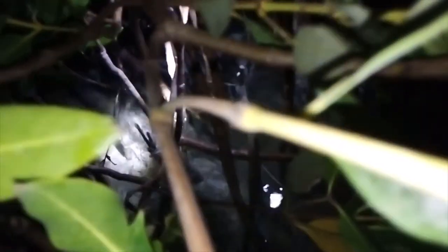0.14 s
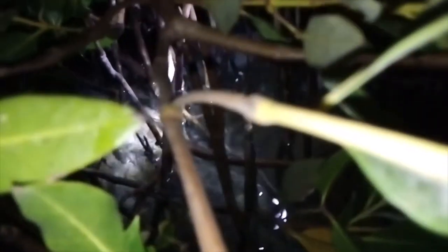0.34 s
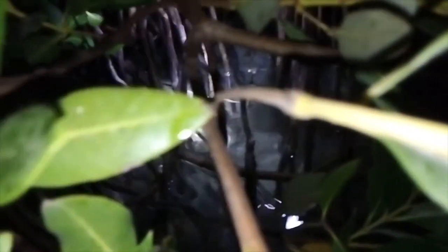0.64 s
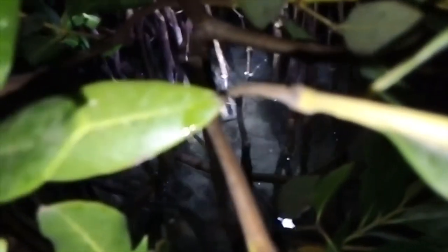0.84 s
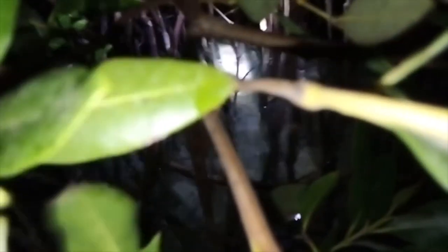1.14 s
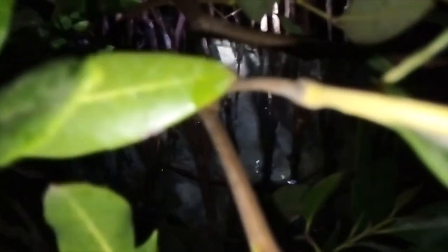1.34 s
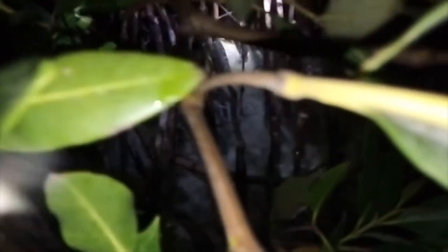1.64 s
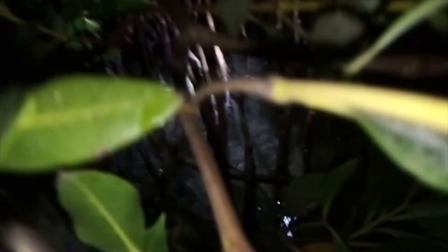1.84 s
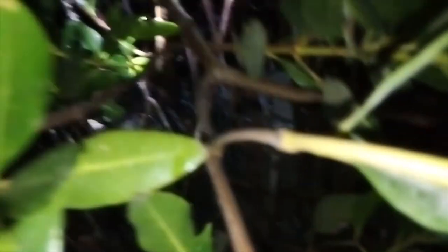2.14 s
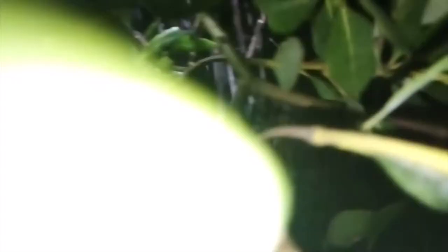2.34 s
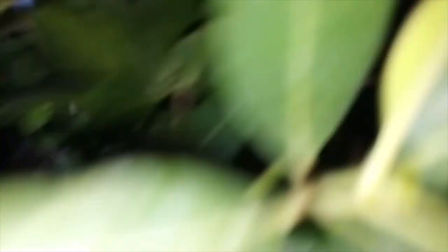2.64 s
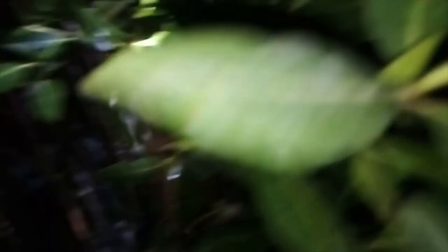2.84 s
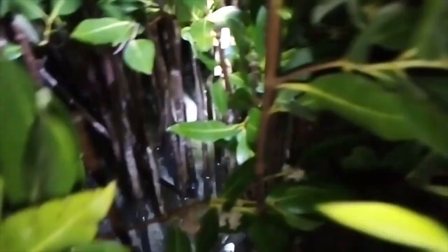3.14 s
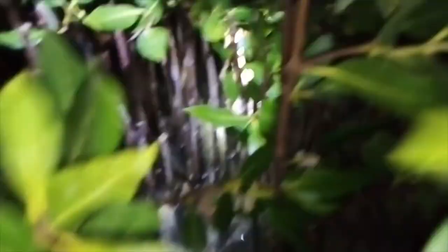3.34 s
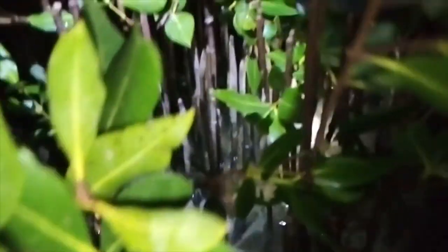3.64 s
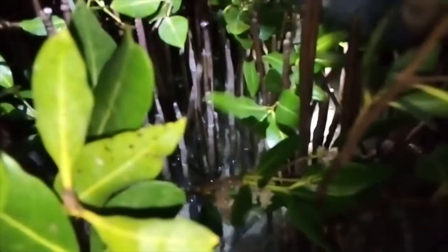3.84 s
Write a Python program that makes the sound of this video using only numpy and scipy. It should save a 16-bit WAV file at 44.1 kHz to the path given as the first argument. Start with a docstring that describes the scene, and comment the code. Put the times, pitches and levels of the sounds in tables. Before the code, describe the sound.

Shallow water sloshes and gurgles softly around wading legs, with leaves brushing the microphone and faint handling rumble. Small splashes, plops and twig ticks follow from 0.5 seconds, easing around 1.3. From 2.2 seconds the sloshing and twig cracks grow, and leaves swish loudly at 3.3. At about 3.7 a branch knocks the microphone in the loudest rush of water and leaves, which quickly fades.

```python
"""Legs wade slowly through shallow water in a thicket, heard by a small hand-held camera.
From the start water sloshes, gurgles and plops with ringing bubbles, leaves scrape past the
microphone and the hand's grip rumbles faintly below. Splashes follow from half a second on, then
twigs tap and tick. After a lull everything swells, and near the end, in a rush of leaves and
water, a branch knocks the camera body."""
import sys
import numpy as np
from scipy import signal
from scipy.fft import rfft, irfft
from scipy.io import wavfile
from scipy.ndimage import uniform_filter1d, map_coordinates

SR = 44100
rng = np.random.default_rng(int(sys.argv[2]) if len(sys.argv) > 2 else 0)


def to_wav(sig):
    """Store sig (one row per channel, or 1-D mono) as 16-bit WAV at the path in sys.argv[1].

    Samples outside -1..1 are clipped; the rate is SR.
    """
    pcm = np.clip(np.atleast_2d(sig), -1, 1) * 32767
    pcm = np.round(pcm).astype(np.int16)
    wavfile.write(sys.argv[1], SR, pcm.T)  # frames by channels


N = 176400

# Tone colour of stirred water, also lent to the twig cracks: f/Hz, level/dB
WATER_SPECTRUM = [(150, -46), (300, 4), (500, -17), (1000, 5.5), (1800, 3), (3200, 4.5), (4500, -6.5),
                  (7000, -9), (9000, -79)]
BUBBLE_HZ, BUBBLE_SPREAD, BUBBLE_CYCLES = 1438, 0.5514, 13.8
BUBBLE_GLIDE = .25  # a bubble's pitch climbs by this fraction over its life


def amp(db):
    return 10 ** (np.asarray(db) / 20)


def unit(x):
    return x / np.sqrt(np.mean(x ** 2) + 1e-20)


def fader(points):
    """A level for every sample, in straight lines between (time, level) points."""
    return np.interp(np.arange(N) / SR, *np.transpose(points))


def wobble(rate):
    """A smooth random curve, rate knots a second."""
    return map_coordinates(rng.standard_normal(int(N * rate / SR) + 4), [np.arange(N) * rate / SR])


def coloured(x, spectrum):
    """x through a minimum-phase filter with the given (Hz, dB) shape."""
    size = 2 ** 18
    hz, db = np.transpose(spectrum)
    gain_db = np.interp(np.log(np.fft.rfftfreq(size, 1 / SR) + 1), np.log(hz), db)
    cepstrum = irfft(gain_db * np.log(10) / 20)
    cepstrum[1:size // 2] *= 2
    cepstrum[size // 2 + 1:] = 0
    return irfft(rfft(x, size) * np.exp(rfft(cepstrum)))[:N]


def patchy_noise(depth_db):
    """White noise with patches of random gain in time and frequency."""
    spectra = signal.stft(rng.standard_normal(N), nperseg=256)[2]
    patches = uniform_filter1d(uniform_filter1d(rng.standard_normal(spectra.shape), 4, 0), 6, 1)
    return unit(signal.istft(spectra * amp(depth_db * unit(patches)), nperseg=256)[1][:N])


def rings(onsets, gain, hz, cycles, glide, attack_cycles):
    """Damped sines; over a life of `cycles` each falls 20 dB and bends by the fraction `glide`."""
    t = np.arange(1400) / SR
    turns = hz[:, None] * t
    lives = turns / np.reshape(cycles, (-1, 1))
    tone = np.sin(2 * np.pi * turns * (1 + glide * lives / 2))
    envelope = amp(-20 * lives) * (1 - np.exp(-turns / attack_cycles)) * np.cos(np.pi * t / t[-1] / 2)
    at = np.round(onsets * SR).astype(int)[:, None] + np.arange(len(t))
    return np.bincount(at.ravel(), (gain[:, None] * tone * envelope).ravel(), N + SR)[:N]


def bubbles(centre_hz, spread, cycles, count):
    """A stream of bubbles at rms 1, log-normal in pitch; the big, low ones tend to ring louder."""
    when, weakness, life = rng.random((count, 3)).T
    hz = np.clip(centre_hz * np.exp(spread * rng.standard_normal(count)), 280, 7000)
    gain = amp(-4 * np.log(weakness + .06) - 2 * np.log2(hz / centre_hz))
    return unit(rings(when * N / SR, gain, hz, cycles * (.5 + life), BUBBLE_GLIDE, attack_cycles=0.78))


def slosh():
    """Legs stir the water: equal parts bubbles and rush, with a crackle of droplets and twigs."""
    # Swell of the sloshing: t/s, level/dB
    swell = [(0, -51), (.2, -49.5), (.48, -44.5), (.6, -49), (.65, -68.5), (.88, -63), (1.0, -51.5),
             (1.15, -58), (1.3, -62.5), (1.38, -73), (1.47, -59.5), (1.7, -54), (1.83, -60.5),
             (2.17, -57.5), (2.32, -44.5), (2.45, -48.5), (2.52, -67), (2.64, -47), (2.9, -46),
             (3.03, -49.5), (3.25, -40.5), (3.42, -45), (3.46, -55.5), (3.58, -49.5), (3.75, -34.5),
             (3.9, -57), (4, -55)]
    rush = unit(coloured(patchy_noise(depth_db=3) * amp(2 * wobble(60)), WATER_SPECTRUM))
    froth = bubbles(BUBBLE_HZ, BUBBLE_SPREAD, BUBBLE_CYCLES, count=1500)
    crackle = amp(-4.5) * bubbles(centre_hz=2090, spread=0.51, cycles=1.43, count=320)
    return amp(fader(swell) + wobble(15)) * (np.sqrt(.5) * (froth + rush) + crackle)


def gurgle():
    """Larger bubbles ring low beneath the slosh."""
    # Swell of the gurgling: t/s, level/dB
    swell = [(0, -50.5), (.4, -48.5), (.56, -66), (.65, -72), (1.9, -93), (2.3, -61), (2.5, -64.5),
             (2.85, -49), (3.4, -55.5), (3.47, -58.5), (3.7, -29), (3.85, -51.5), (4, -65)]
    return amp(fader(swell)) * bubbles(centre_hz=564.5, spread=0.285, cycles=BUBBLE_CYCLES, count=1300)


def leaves():
    """Near leaves scrape, flick and drip past the microphone; far leaves hiss steadily."""
    # Swell of the scraping: t/s, level/dB
    swell = [(0, -59), (.3, -58), (.6, -66), (.68, -66.5), (.85, -63.5), (1.0, -68.5), (1.27, -66),
             (1.33, -87), (1.41, -61.5), (1.85, -65.5), (2.2, -53.5), (2.45, -55), (2.51, -53.5),
             (2.8, -51), (3.0, -51.5), (3.22, -52), (3.33, -47), (3.43, -43), (3.46, -53), (3.56, -42.5),
             (3.76, -31), (3.9, -45.5), (3.945, -56.5), (4, -75)]
    # Flicks and swishes, sudden bursts of the same scraping: t/s, level/dB, t60/s, rise/s
    flicks = [(0.588, -40.5, 0.047, 0.0017), (0.8032, -46.5, 0.033, .0004), (.865, -41.5, 0.07, 0.00055),
              (.891, -45.5, 0.099, 0.00029), (0.94, -45.5, 0.16, .0005), (1.162, -47, 0.059, 0.00093),
              (1.205, -51.5, 0.11, 0.00095), (2.008, -45.5, 0.13, 0.005), (2.247, -62, 0.016, 0.00055),
              (2.407, -40, 0.084, 0.0033), (2.62, -36, 0.026, 0.00044), (2.769, -34, 0.0085, 0.00039),
              (3.045, -56, 0.02, 0.0049), (3.261, -11, 0.15, 0.013), (3.377, -26.5, 0.042, 0.0038),
              (3.503, -27, 0.094, 0.0087), (3.579, -37.5, 0.07, .001), (3.605, -20, 0.023, 0.00095),
              (3.646, -18, 0.051, 0.0059), (3.672, -25.5, 0.028, 0.0013), (3.709, -22, 0.05, 0.0023),
              (3.957, -29, 0.032, 0.00049), (3.967, -40.5, 0.014, 0.00041)]
    # Leaf scrape as heard through the microphone's resonances and treble cut-off: f/Hz, level/dB
    scrape_at_mic = [(300, -19), (1200, -10.5), (2700, -1), (4340, -6), (6300, 0.5), (7200, -5.5),
                     (8300, -14), (13200, -25.5), (14900, -12.5), (15700, -11), (15950, -72)]
    scratches_per_s, scratch_share = 3600, 0.54
    scrape_db = fader(swell)
    sizes = amp(3 * np.minimum(rng.exponential(size=N), 2.5))
    scratches = unit((rng.random(N) < scratches_per_s / SR) * rng.standard_normal(N) * sizes)
    rub = np.sqrt(scratch_share) * scratches + np.sqrt(1 - scratch_share) * patchy_noise(depth_db=5.5)
    stroke = amp(scrape_db + 2.5 * wobble(30))
    for onset, db, t60, rise in flicks:
        age = np.clip(np.arange(N) / SR - onset, 0, 1)
        stroke += amp(db - 60 * age / t60) * (1 - np.exp(-age / rise)) ** 2 * (age < 1)
    drips = amp(scrape_db - 12) * bubbles(centre_hz=4800, spread=.25, cycles=14, count=240)
    near = coloured(rub * stroke, scrape_at_mic) / np.std(coloured(rub, scrape_at_mic)) + drips
    # Closer leaves are louder and brighter: the treble rides the level of the stroke.
    treble_hz, neutral_db, treble_db_per_db = 8700, -60.5, 0.16
    treble = signal.sosfiltfilt(signal.butter(4, treble_hz, "high", fs=SR, output="sos"), near)
    treble_gain = (stroke / amp(neutral_db)) ** treble_db_per_db
    far = amp(-77) * unit(coloured(rng.standard_normal(N), scrape_at_mic))
    return near + treble * (treble_gain - 1) + far


def grip_rumble():
    """The hand's grip sends a lumpy rumble through the camera body."""
    # Swell of the handling noise: t/s, level/dB
    swell = [(0, -62.5), (.4, -57), (.76, -64), (1.65, -62.5), (1.9, -64), (2.2, -55), (2.5, -60.5),
             (2.95, -45.5), (3.08, -52.5), (3.37, -38), (3.47, -62), (3.6, -36.5), (3.75, -31), (3.86, -61),
             (4, -52)]
    # Tone colour of the hand on the housing: f/Hz, level/dB
    hand_spectrum = [(25, -23), (50, -6), (110, -2), (170, -5.5), (300, -8.5), (450, -14), (900, -69)]
    lumpy_noise = rng.standard_normal(N) * amp(2.5 * wobble(21.93))
    return amp(fader(swell)) * unit(coloured(lumpy_noise, hand_spectrum))


def plops_and_pings():
    """Short ringing tones that chirp upward: single bubbles, and the bright ring of two leaf flicks."""
    # Bubbles, and leaf rings at 0.865 and 0.892 s: t/s, level/dB, starting f/Hz, life/cycles
    tones = [(.045, -37.5, 486, 20), (.078, -38, 533, 15), (.092, -33.5, 1460, 10.4),
             (.106, -36, 586, 13.4), (.247, -33, 1110, 8.6), (.324, -26.5, 3020, 12),
             (.457, -35.5, 3850, 15), (0.865, -37, 6350, 40), (.892, -32, 5870, 41),
             (1.157, -36.5, 2130, 14), (2.54, -28.5, 409, 4.5), (2.566, -31.5, 2930, 17),
             (2.6, -29.5, 4730, 25), (3.437, -24, 1440, 7.6), (3.829, -24.5, 1140, 14.5)]
    onsets, db, hz, cycles = np.transpose(tones)
    return rings(onsets, amp(db), hz, cycles, BUBBLE_GLIDE, attack_cycles=0.79)


def splashes():
    """Each splash is a band of grainy noise and bubbles that swells and dies."""
    # Separate splashes: peak t/s, rms level at the peak/dB, rise/s, t60/s, centre f/Hz
    cues = [(0.551, -33.5, 0.038, 0.058, 1500), (0.615, -37, 0.0033, 0.066, 1010),
            (0.746, -47.5, 0.025, 0.1, 1040), (.915, -47, 0.0097, 0.68, 1320),
            (0.975, -39.5, 0.037, 0.2, 1140), (1.006, -49, 0.0045, 0.038, 1500),
            (1.064, -26, 0.0054, 0.017, 1430), (1.076, -29.5, 0.0019, 0.013, 1480),
            (1.088, -43, 0.0014, 0.013, 1960), (1.21, -49, 0.0053, 0.17, 4800),
            (1.479, -50.5, .05, 0.86, 1290), (1.643, -48, 0.034, 0.16, 1390),
            (1.999, -44, 0.012, 0.27, 1090), (2.19, -36, 0.01, .15, 1050), (2.298, -41, 0.017, 0.11, 1560),
            (2.358, -41, 0.03, 0.14, 2140), (2.946, -39, 0.019, 0.2, 1400),
            (3.137, -37.5, 0.032, 0.11, 1120), (3.178, -35, 0.023, 0.021, 1280),
            (1.895, -51.5, 0.043, 0.61, 1340), (3.608, -20, 0.0021, 0.044, 1700),
            (3.656, -25.5, 0.019, 0.48, 1170), (3.679, -11.5, 0.003, 0.023, 2050),
            (3.713, -18, 0.005, 0.047, 1520), (3.733, -19.5, 0.013, 0.028, 2140),
            (3.831, -35.5, 0.011, 0.1, 1450), (3.876, -37.5, 0.024, 0.072, 1630)]
    width_octaves, lowpass_hz, lead_in = 1.205, 4500, SR // 5
    t, out = np.arange(-lead_in, SR // 2) / SR, np.zeros(N + SR)
    length = len(t)
    hz = np.fft.rfftfreq(length, 1 / SR) + 1
    froth = bubbles(BUBBLE_HZ, BUBBLE_SPREAD, BUBBLE_CYCLES, count=1800)
    grain = amp(2.5 * wobble(200))
    for peak_s, db, rise, t60, centre_hz in cues:
        start = rng.integers(N - length)
        band = np.exp(-(np.log2(hz / centre_hz) / width_octaves) ** 2 / 2) / (1 + (hz / lowpass_hz) ** 6)
        noise = rng.standard_normal(length) * grain[start:][:length]
        rush = unit(irfft(rfft(noise) * band / np.sqrt(hz), length))
        bubbling = unit(irfft(rfft(froth[start:][:length]) * band, length))
        envelope = np.where(t < 0, np.exp(-(t / rise) ** 2), amp(-60 * np.abs(t) / t60))
        out[round(peak_s * SR):][:length] += amp(db) * envelope * unit(rush + bubbling)
    return out[lead_in:][:N]


def twig_taps():
    """A struck twig gives a dry crack, a short ring and a weaker overtone."""
    # Twig hits: t/s, level/dB, f/Hz, life/cycles (held to at least one)
    hits = [(.77, -32, 3130, 6), (.835, -36, 1800, 0.99), (.912, -20.5, 2230, 1.9), (1.118, -35, 1500, 3.4),
            (1.537, -32.5, 1520, 0.81), (1.99, -37, 1000, 14), (2.182, -16.5, 657, 1.85),
            (2.187, -18, 960, 2.4), (2.255, -21.5, 1830, 0.84), (2.357, -22, 2060, 6.2),
            (2.699, -14, 1296, 3.6), (2.709, -25, 1160, 7.2), (2.862, -14.5, 2330, 1.8),
            (2.934, -15, 1540, 0.72), (3.177, -21.5, 1510, 2.8), (3.214, -25.5, 1500, 3),
            (3.361, -12.5, 1500, 0.78), (3.565, -23.5, 1170, 2.4), (3.671, -6, 3350, 3.6),
            (3.958, -30.5, 910, 4.8)]
    crack_db, crack_t60_s = -13, 0.012
    onsets, db, hz, cycles = np.transpose(hits)
    cycles = np.maximum(cycles, 1)
    ring = rings(onsets, amp(db), hz, cycles, glide=0, attack_cycles=0.3)
    overtone = rings(onsets, amp(db - 6.5), 1.83 * hz, cycles, glide=0, attack_cycles=0.55)
    t, cracks = np.arange(600) / SR, np.zeros(N + SR)
    for onset, gain in zip(onsets, 2 * amp(db + crack_db)):
        burst = rng.standard_normal(len(t)) * amp(-60 * t / crack_t60_s)
        cracks[round(onset * SR):][:len(t)] += gain * burst
    return ring + overtone + coloured(cracks[:N], WATER_SPECTRUM)


def low_thuds():
    """Dull thuds that sag in pitch: two deep water plops, then a branch knocking the camera body."""
    # Two deep plops, then the knocks from 3.5 s on: t/s, level/dB, f/Hz
    thuds = [(1.058, -31.5, 278), (1.63, -43, 194), (3.539, -22, 136), (3.601, -11, 372), (3.6737, -5, 720),
             (3.677, 0.5, 670), (3.6776, -7, 129), (3.6789, 1, 299), (3.6868, 0.5, 170), (3.688, -3.5, 650),
             (3.766, -15, 310), (3.809, -20, 270)]
    onsets, db, hz = np.transpose(thuds)
    return -rings(onsets, amp(db), hz, cycles=2.4, glide=-0.12, attack_cycles=0.23)


def scene():
    """Beds of water, leaves and handling under the separate hits, in mono."""
    beds = slosh() + gurgle() + leaves() + grip_rumble()
    return (beds + plops_and_pings() + splashes() + twig_taps() + low_thuds())[None]


def record(dry):
    """The camera cuts the deep bass steeply and keeps nothing above its band limit."""
    low_cut_hz, top_hz = 65, 16790
    hz = np.fft.rfftfreq(N, 1 / SR)
    return irfft(rfft(dry) * (hz < top_hz) * hz ** 3 / (hz ** 3 + low_cut_hz ** 3), N)


dry = scene()
out = record(dry)
to_wav(out)
```